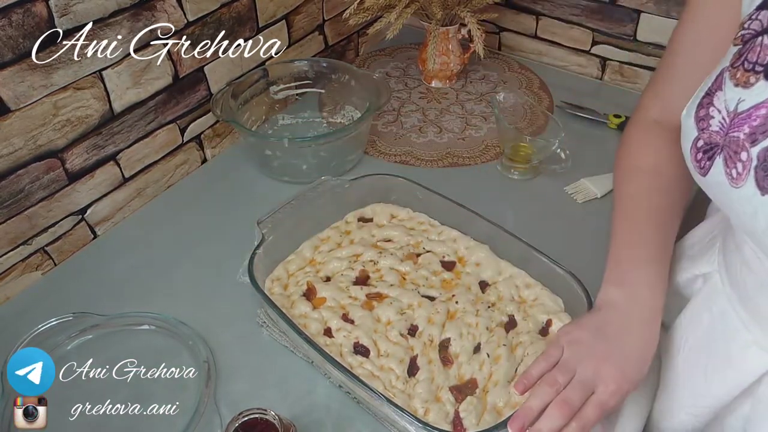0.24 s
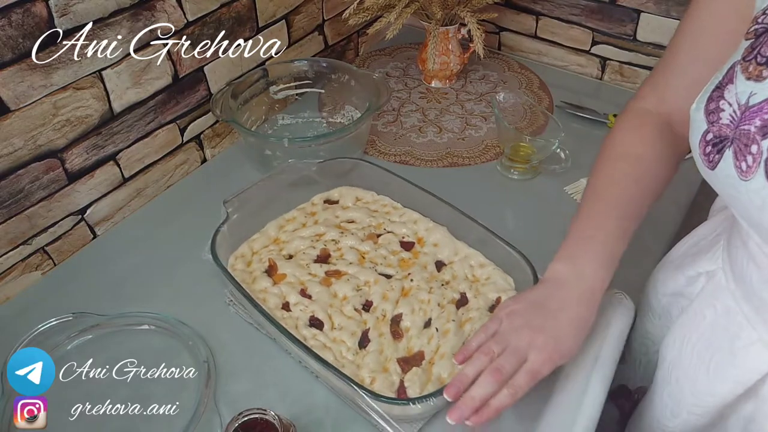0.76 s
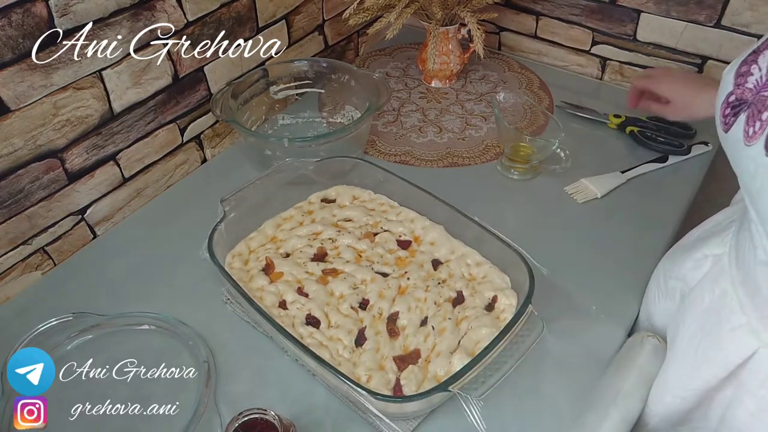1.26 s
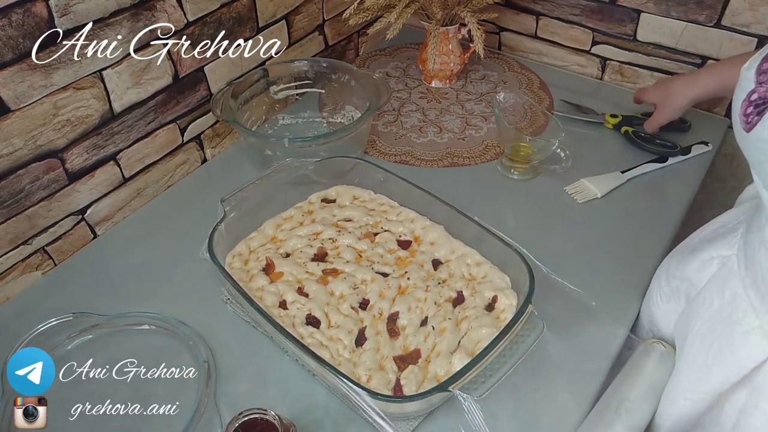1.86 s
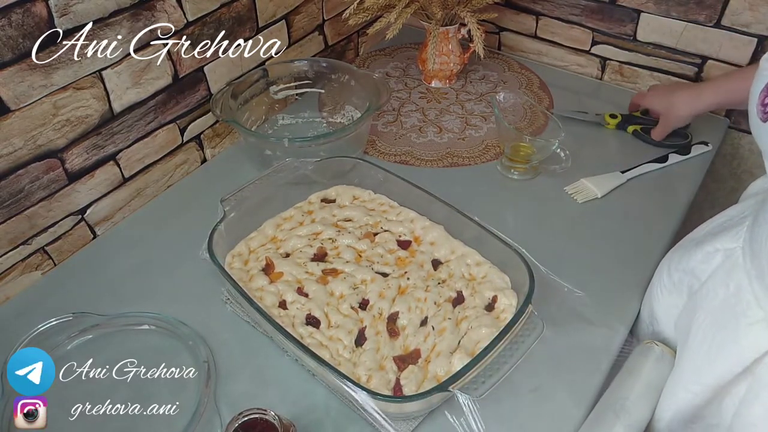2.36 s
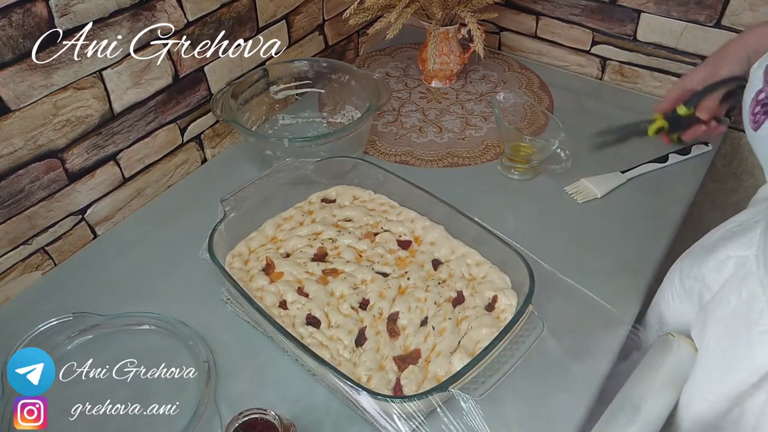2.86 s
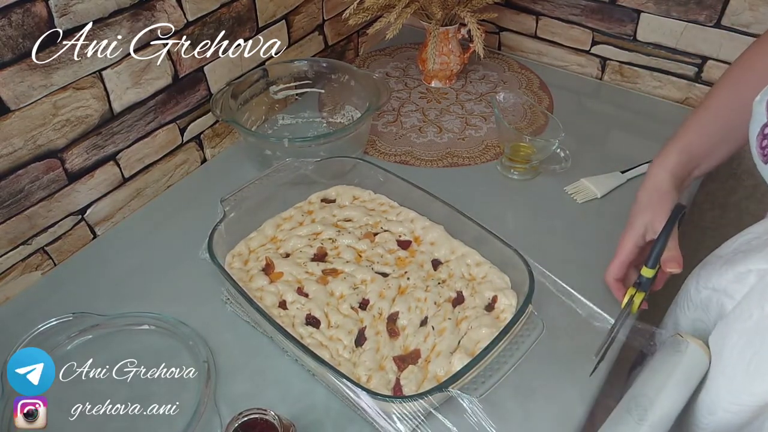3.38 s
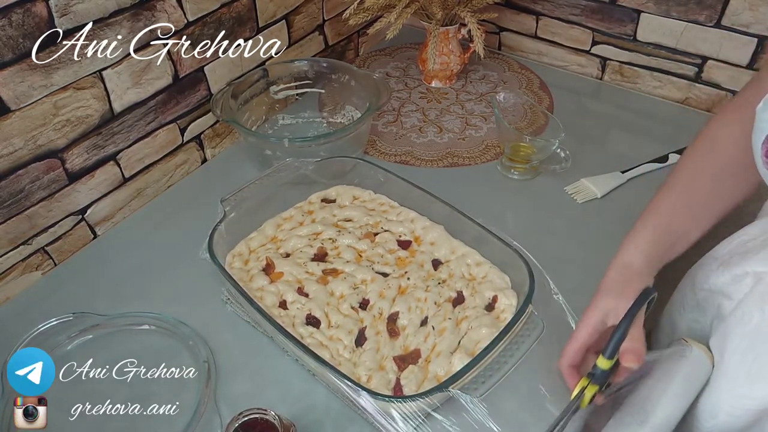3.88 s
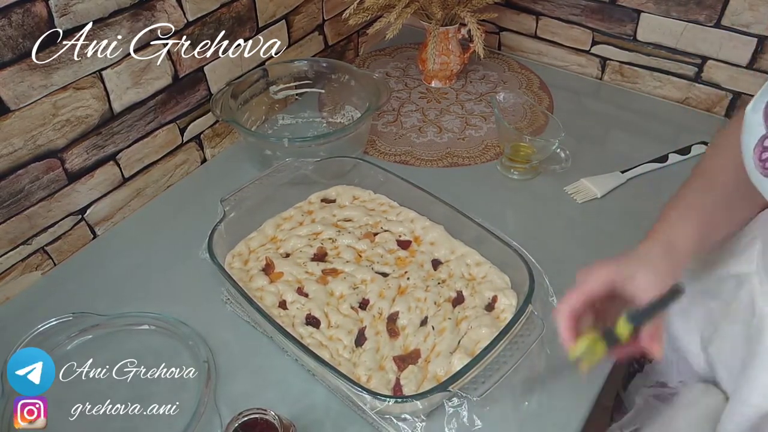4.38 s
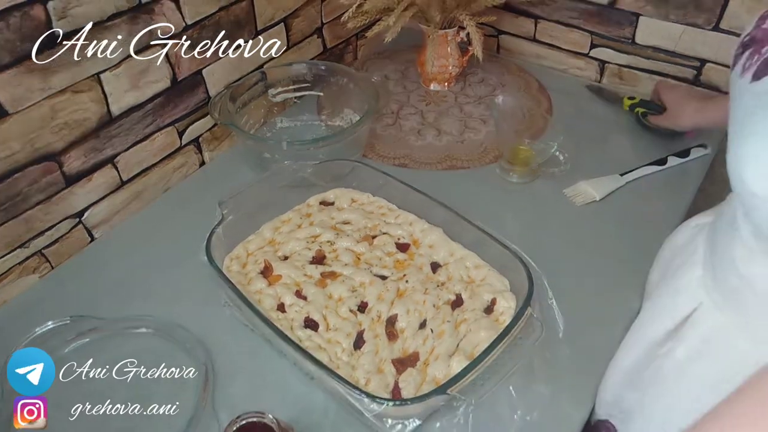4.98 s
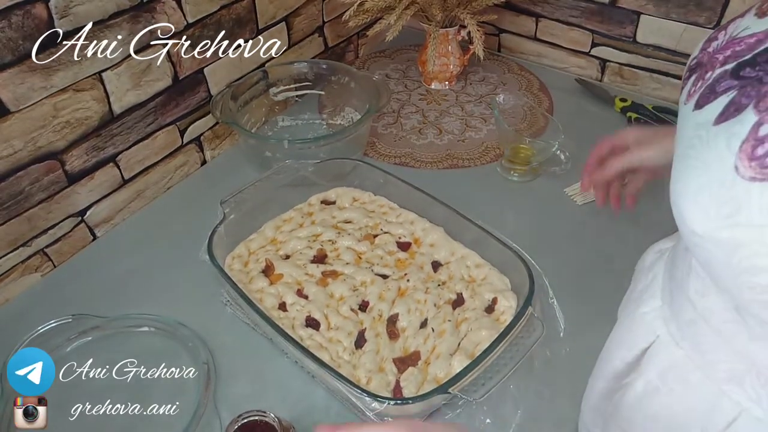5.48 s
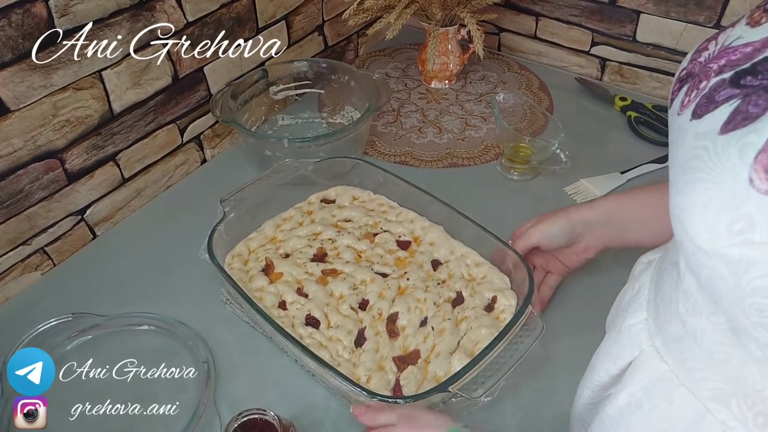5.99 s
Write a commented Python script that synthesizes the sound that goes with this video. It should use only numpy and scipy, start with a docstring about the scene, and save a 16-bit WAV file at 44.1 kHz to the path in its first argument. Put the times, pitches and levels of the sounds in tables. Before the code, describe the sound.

In a quiet kitchen, hands rub thin plastic film with faint crackles and light table knocks. Scissors are picked up with a sharp clack, then glide through the film in a raspy, wavering resonant note with bright snaps. They are laid down with a ringing knock, and a heavy bump hits the left of the close two-capsule microphone. A short slide and quiet rubbing follow, over faint motor whir and hiss.

```python
"""Hands smooth cling film over a dish in a quiet kitchen, close to a small two-capsule microphone: film rub,
crackle and snaps are coloured noise slips and puffs. Scissors are picked up, glide through the film with a wavering
resonant note, then are laid down with ringing knocks; bumps and rubbing at the left capsule are noise through its
resonances. Behind lie a faint motor of wavering sines, a low hum near 50 Hz with a low thump at about 0.26 s,
thin treble ticking and noise for room and hiss."""
import sys
import numpy as np
from scipy import signal
from scipy.fft import rfft, irfft
from scipy.io import wavfile
from scipy.ndimage import uniform_filter1d

SR = 44100
rng = np.random.default_rng(int(sys.argv[2]) if len(sys.argv) > 2 else 0)


def store_wav(level_fs):
    """Save 16-bit WAV to argv[1]."""
    pcm = np.round(np.clip(np.atleast_2d(level_fs), -1, 1) * 32767)
    wavfile.write(sys.argv[1], SR, pcm.T.astype(np.int16))


N = 275184


def gain_of(db):
    """Decibels to gain."""
    return 10 ** (np.asarray(db) / 20)


def evened(x):
    """Scales to rms 1."""
    return x / np.sqrt(np.mean(x ** 2) + 1e-20)


def read(points, hz):
    """Reads a spectrum table on a log-frequency axis."""
    f, value = np.transpose(points)
    return np.interp(np.log(hz + 1), np.log(f + 1), value)


def level(rows, columns=(1,)):
    """Gain curve through the summed dB columns, -130 dB outside the rows."""
    rows = np.array(rows)
    db = rows[:, list(columns)].sum(axis=1)
    return gain_of(np.interp(np.arange(N) / SR, rows[:, 0], db, -130, -130))


def swells(rows):
    """Gain curve of swells that rise and die away at a constant dB rate around each loudest moment."""
    t = np.arange(N) / SR
    return sum(gain_of(db - 20 * np.maximum((s - t) / build, (t - s) / die)) for s, db, build, die in rows)


def add(mix, s, sound):
    """Mixes a sound in at s seconds."""
    part = mix[round(s * SR):][:len(sound)]
    part += sound[:len(part)]


def coloured(x, points):
    """Minimum-phase filter with the shape of a spectrum table and unit energy."""
    db = np.maximum(read(points, abs(np.fft.fftfreq(4096, 1 / SR))), -100)
    spectrum = np.exp(np.conj(signal.hilbert(np.log(gain_of(db)))))
    taps = np.fft.ifft(spectrum).real[:2048]
    return signal.oaconvolve(x, taps / np.linalg.norm(taps))[:len(x)]


def resonate(x, hz, width):
    """A resonance of gain 1 whose centre may move: shifts to zero frequency, smooths, shifts back."""
    turn = np.exp(2j * np.pi * np.cumsum(hz * np.ones(len(x))) / SR)
    r = np.exp(-np.pi * width / SR)
    return 2 * (turn * signal.lfilter([1 - r], [1, -r], x / turn)).real


def grains(per_s, spread_db, smooth):
    """Sparse slips of unequal size over a share of smooth noise."""
    size = gain_of(spread_db * np.minimum(rng.exponential(1, N), 4))
    size = size * (rng.random(N) < per_s / SR)
    slips = evened(size * rng.standard_normal(N))
    return evened(slips + smooth * rng.standard_normal(N))


def wavering(hz, depth, width):
    """A tone whose level and phase wander, by adding narrow noise at its own frequency."""
    t = np.arange(N) / SR
    wander = evened(resonate(rng.standard_normal(N), hz, width))
    return evened(np.sin(2 * np.pi * hz * t) + depth * wander)


def patchy(x, depth_db):
    """Random patches of pitch and time come forward and fall back, alike on both sides."""
    z = signal.stft(x, nperseg=512)[2]
    patches = rng.standard_normal(z.shape[:0:-1])  # time by frequency
    patches = uniform_filter1d(uniform_filter1d(patches, size=8, axis=0), size=24, axis=1).T
    return signal.istft(z * gain_of(depth_db * evened(patches)), nperseg=512)[1][:, :N]


# Body of the film's rub. Each row: frequency in Hz, density in relative dB per Hz.
RUB_COLOUR = [(120, -61.5), (200, -7.5), (415, -8), (473, -2), (575, -2), (815, -12), (1040, -10),
              (1150, -1), (1480, -2), (2060, 5), (2700, -21.5), (3510, -60.5), (5940, -120)]
# Thin upper part of the rub. Each row: frequency in Hz, density in relative dB per Hz.
THIN_COLOUR = [(1500, -34), (2500, 2), (3500, 1), (4800, -4.5), (5600, -28), (8000, -48.5)]
# Treble of crackle and snaps. Each row: frequency in Hz, density in relative dB per Hz.
FIZZ_COLOUR = [(2940, -17.5), (5000, -10), (5560, -26.5), (5960, -23.5), (9310, -16), (11100, -12.5),
               (13500, -15), (15100, -9.5), (16000, -10)]
# Strokes of hands on film, one list per passage. Each row: time in seconds, rub level in relative dB,
# thin part in dB over it.
RUB_STROKES = [
    [(0.0, -76, -9), (0.55, -77, -1.5), (0.6, -74, 7), (0.88, -72.5, 1.5), (1.21, -77.5, -4),
     (1.4, -87, -27), (1.55, -72, -26), (1.74, -73, -6), (1.95, -77, -3.5), (2.21, -86, -1), (2.43, -64, 0),
     (2.89, -78.5, -12.5), (3.23, -88.5, 3), (3.35, -71.5, -14)],
    [(4.35, -70, -5), (4.43, -83, 1.5), (4.8, -77.5, -4)],
    [(5.7, -66.5, -11.5), (5.906, -67, -6), (6.24, -76, -4)],
]
# Blades gliding through film. Each row: time in seconds, rub level and fine crackle level in relative dB.
CUT = [(3.35, -78, -104), (3.41, -68, -91), (3.6, -63, -85), (3.666, -61.5, -72), (3.73, -48.5, -51),
       (3.775, -53.5, -58.5), (3.81, -49, -53), (3.84, -52, -49), (3.88, -47, -49), (3.96, -50, -46),
       (4.07, -52, -50), (4.14, -48.5, -54), (4.19, -52, -54), (4.25, -74, -75), (4.35, -75, -100)]
# Scissors sliding to rest. Each row: time in seconds, rub level in relative dB.
SLIDE = [(5.262, -95), (5.283, -37), (5.298, -55), (5.382, -49.5), (5.579, -56), (5.6, -64), (5.655, -73),
         (5.699, -59.5)]
# Resonant note of the film. Each row: time in seconds, centre frequency in Hz before it wavers,
# note level in dB over the rub.
FILM_NOTE = [(3.45, 819, 5.5), (3.62, 790, 10.5), (3.72, 813, 2), (3.81, 823, 7.5), (3.9, 935, 2.5),
             (3.98, 878, 0.5), (4.07, 893, 3.5), (4.25, 774, -5.5)]
# Bursts of fine crackle. Each row: loudest moment in seconds, level in relative dB,
# build-up and dying away in seconds per 20 dB.
CRINKLES = [(.31, -61.5, 0.039, 0.038), (.66, -71.5, 0.23, 0.7), (.96, -74, .1, 0.017),
            (1.04, -78, 0.019, 0.16), (2.36, -85, .01, 0.19), (3.13, -82, 0.99, 0.1043),
            (3.4, -75.5, .045, 0.58), (3.54, -72, .1, 0.02927), (3.6, -71, .05, 0.12),
            (4.36, -76.5, 0.23, 0.62), (4.968, -42.5, 0.0023, 0.041), (5.0, -57.5, 0.026, 0.21),
            (5.272, -63, 0.0075, 0.075), (5.44, -64.5, 0.15, 0.065), (5.54, -64, 0.17, 0.16),
            (5.87, -70.5, 0.17, 0.23), (6.07, -69, 0.1, 0.088)]
CUT_THIN_DB, SLIDE_THIN_DB = -5.5, -11  # thin part over the rub


def film():
    """Dense stick-slips make a shared rub and note, while thin part and fizz differ on the two sides."""
    flutter = gain_of(1.5 * evened(uniform_filter1d(rng.standard_normal(N), 600)))
    note_s, note_hz, note_db = np.transpose(FILM_NOTE)
    t = np.arange(N) / SR
    hz, note_db = np.interp(t, note_s, note_hz), np.interp(t, note_s, note_db)
    hz *= 1 + 0.054 * evened(uniform_filter1d(rng.standard_normal(N), 1800))  # tension wavers

    body = sum(level(rows) for rows in RUB_STROKES + [CUT, SLIDE])
    thin = sum(level(rows, (1, 2)) for rows in RUB_STROKES)
    thin += gain_of(CUT_THIN_DB) * level(CUT) + gain_of(SLIDE_THIN_DB) * level(SLIDE)
    clumps = gain_of(1.2 * evened(uniform_filter1d(rng.standard_normal(N), 2000)))
    fizz = (swells(CRINKLES) + level(CUT, (2,))) * clumps

    slips = grains(per_s=1500, spread_db=1.8, smooth=1.6)
    note = evened(resonate(resonate(slips, hz, 190), hz, 360))
    upper_modes = evened(resonate(resonate(slips, 2.43 * hz, 220), 2.13 * hz, 400))
    near_modes = evened(resonate(resonate(slips, 1.317 * hz, 130), 1.39 * hz, 220))
    slide_hiss = evened(resonate(resonate(slips, 7400, 2200), 6100, 2600))
    rub = body * (coloured(slips, RUB_COLOUR) + gain_of(note_db) * note)
    rub += body * gain_of(note_db - 6.5) * upper_modes
    rub += body * gain_of(note_db - 10.5) * near_modes
    rub += gain_of(-22) * level(SLIDE) * slide_hiss

    fine = []
    for _ in "LR":
        thin_part = thin * coloured(grains(per_s=980, spread_db=2.0, smooth=1.0), THIN_COLOUR)
        crackle = fizz * coloured(grains(per_s=2000, spread_db=2.0, smooth=2.2), FIZZ_COLOUR)
        fine.append(thin_part + crackle)
    return (rub + patchy(np.array(fine), depth_db=2.5)) * flutter


# Single snaps of the film. Each row: start in seconds, level in relative dB, low click in dB over it.
SNAPS = [(0.2936, -52.5, 16), (0.6511, -47, 5.5), (0.925, -59.5, 21.5), (0.9300, -60, 29.5),
         (0.9572, -44.5, 10.5), (2.355, -62, 21), (2.373, -49, 20), (3.0948, -72, 19), (3.293, -56.5, 11),
         (3.3984, -59, 14), (3.541, -49, -4), (3.5773, -55, -7), (3.593, -44.5, 9), (3.599, -48, -4),
         (3.631, -46, -6), (3.6666, -64.5, -11), (3.686, -38, -16), (3.705, -33, -6), (3.734, -37.5, -9),
         (3.789, -41, -8), (3.9945, -51, 10), (4.055, -51, 10), (4.094, -41, 12), (4.162, -41, 4),
         (4.1788, -34, 1), (4.185, -39, -6), (4.206, -42, -6), (4.9658, -26.5, 5.5), (5.2707, -57, 10),
         (5.278, -53, 15), (5.2844, -54, 19), (5.37, -56, 18), (5.444, -51, 20), (5.8713, -51.5, 12),
         (6.054, -45, -7)]
# Lower click of a snap. Each row: frequency in Hz, density in relative dB per Hz.
SNAP_COLOUR = [(500, -28), (1100, -1.5), (2400, -7.5), (4800, -20), (6500, -40.5)]


def snaps():
    """Single creases snap: a tiny noise puff, heard as a bright tick and a lower click."""
    high, low, t = np.zeros(N), np.zeros(N), np.arange(300) / SR
    for (s, db, low_db), puff in zip(SNAPS, rng.standard_normal((len(SNAPS), 300))):
        puff = puff * gain_of(-60 * t / 0.009) * (1 - np.exp(-t / 0.0002))
        puff = gain_of(db + 6.0) * puff / np.linalg.norm(puff)
        add(high, s, puff)
        add(low, s, puff * gain_of(low_db))
    return coloured(high, FIZZ_COLOUR) + coloured(low, SNAP_COLOUR)


# Knocks on the table. Each row: time in seconds, level in relative dB, favoured mode in Hz, its lift in dB,
# tilt of thud, low, middle and bright modes in dB over the level, damping as a factor on the decay rate.
KNOCKS = [(0.243, -60, 994, 1.9, 14, 9, -1, -2, 2.7), (0.301, -52, 710, 7, -10, -39, -7, -5, 1.06),
          (0.339, -47.5, 880, 6.9, -30, -11, -8, -5, 6.1), (0.518, -55, 710, 11, 1, -29, -4, -3, 2),
          (1.105, -55, 1024, 8.6, -19.5, -8, -8.5, -9.5, 1.16),
          (1.354, -47.5, 687, 6.6, -4.5, 13, -43, -15, 2.5),
          (1.567, -46, 816, 12.7, -11, 2.5, -6, -17, 0.89),
          (1.748, -56.5, 760, 15, -12.5, 5.5, -17, -16, 0.41),
          (2.097, -58.5, 928, 10, -11, -8, -23, 0.5, 1.1), (2.195, -58, 637, 9.2, -32, 3, -28, -11, 0.89),
          (2.242, -56, 1278, 7.3, -20, -13, -2, -10, 0.43), (2.249, -50, 790, 21, -17, -8, -9, -15, 0.93),
          (2.3655, -32.5, 910, 7.4, -4, -4, 3, -2.5, 3.96), (2.4141, -43.5, 3750, 6, -5, -4.5, -6, 0, 2.2),
          (2.649, -42, 793, 11, -5, 4.5, -8.5, -30, 3.25), (3.255, -44, 690, 10, -6, 2, -2.5, -10, 3.3),
          (4.922, -43.5, 2155, 52, -27, -42, -23, -5, 2.4),
          (4.923, -27, 688, 10.6, -17, 9.5, -19.5, -15.5, 2.12),
          (5.232, -45, 676, 5.4, -6.5, -7, -16, -33, 0.79),
          (5.281, -40.5, 806, 7.7, 0.5, -10, -16, -13, 1.6), (5.367, -44.5, 710, 5.2, -6, -1, -10, -6, 0.8),
          (5.441, -40.5, 1000, 14, -6, 16, -9, -0.5, 5.2), (5.593, -51, 712, 6, -25, -4.5, -15, -9, 0.53),
          (6.138, -51, 940, 11, -18, -24, -8.5, -11.5, 1.5)]
# Modes a knock rings. Each row: frequency in Hz before slight detuning, level in relative dB,
# 60 dB decay time in seconds at damping 1.
RINGS = [(114, 5, 0.41), (149.9, 8, 0.092), (196.5, -2, 0.27), (335, -5, 0.08), (369, 0, 0.05),
         (672, -1, 0.11), (804, -5, 0.16), (866.5, -0.5, 0.1), (985, -1.5, 0.098), (1246, -5, 0.12),
         (1278, 5.5, 0.099), (1370, 7.5, 0.068), (1643, 2.5, 0.061), (1973, -7.5, 0.17), (2193, -8, 0.17),
         (2470, -26, 0.048), (2970, -8, 0.026), (3550, 8.5, 0.065), (3660, 5, 0.038), (4100, 8, 0.026)]
KNOCK_RISE_S = 0.00058
TOP_DB, TOP_PER_BRIGHT = -9, 1.4  # the highest modes follow the brightness, more steeply


def knocks():
    """Each knock cracks and excites the same modes, tilted by where and how hard it lands; loose parts chatter."""
    out, t = np.zeros(N), np.arange(SR // 2) / SR
    crack_t = t[:1500]
    hz, db, t60 = np.transpose(RINGS)[:, :, None]
    cracks = rng.standard_normal((len(KNOCKS), 1500))
    chatter = uniform_filter1d(uniform_filter1d(rng.standard_normal(N), 300), 150)
    chatter = 1 + 0.25 * evened(chatter)
    luck = rng.random((len(KNOCKS), 2, len(RINGS), 1))
    for row, (detune, phase), crack in zip(KNOCKS, luck, cracks):
        s, knock_db, main_hz, lift_db, thud, low, middle, bright, damp = row
        top = TOP_DB + TOP_PER_BRIGHT * bright
        tilt = [(40, thud - 30), (113, thud), (350, low), (800, -0.5), (1350, middle), (2100, bright),
                (3600, top), (5000, top - 8), (6500, top - 35)]
        favour_db = lift_db * np.exp(-((hz - main_hz) / 45) ** 2)
        rise_s = KNOCK_RISE_S / 2 + 0.67 / hz  # low modes take longer to build
        damping = np.where(hz < 150, np.sqrt(damp), damp)  # the table top is harder to damp
        fall_db = 60 * t * damping / t60
        ring = gain_of(db + read(tilt, hz) + favour_db - fall_db) * (1 - np.exp(-t / rise_s)) ** 2
        ring *= np.sin(2 * np.pi * (hz * (1 + 0.063 * (detune - .5)) * t + phase))
        add(out, s - .002, gain_of(knock_db) * ring.sum(0))

        crack = crack * gain_of(-60 * crack_t * damp / 0.12) * (1 - np.exp(-crack_t / rise_s[-1]))
        crack = coloured(crack, tilt + [(16000, top - 60)])
        add(out, s - .001, gain_of(knock_db + 1.5) * crack * np.linspace(1, 0, 1500))
    return out * chatter


# Hands pressing on the table top. Each row: loudest moment in seconds, level in relative dB,
# build-up and dying away in seconds per 20 dB.
PRESSES = [(.03, -65, 0.11, 0.56), (.27, -52, 0.11, 0.047), (.45, -65.5, 0.1, 0.12),
           (.575, -61.5, 0.09, 0.27), (.91, -62, 0.022, 0.13), (1.27, -65.5, 0.036, 0.18),
           (1.41, -54.5, 0.089, 0.45), (1.76, -60, 0.13, 0.17), (2.27, -58.5, 0.31, 0.13),
           (2.42, -41.5, .06, 0.059), (2.57, -61, 0.091, 0.11), (2.69, -64, .06, 0.066),
           (2.84, -64.5, 0.099, .05), (3.29, -55.5, 0.2, 0.11), (3.62, -71, 0.12, 0.1),
           (3.77, -52, 0.24, 0.1)]


def table_top():
    """The two lowest modes of the table, stirred unevenly by hands."""
    upper = gain_of(-13.0) * evened(resonate(rng.standard_normal(N), 190, 44))
    return (wavering(111, depth=0.44, width=10.0) + upper) * swells(PRESSES)


# Bumps on the left capsule. Each row: start in seconds, mount level in relative dB, shell and sharp edge in dB
# over it, 60 dB decay time in seconds after a short hold, favoured mount mode in Hz.
BUMPS = [(4.9656, -19, -17.5, -15, 0.031, 245), (4.974, -19.5, -11, -6, 0.035, 238),
         (4.9866, -19, -14, -14, 0.027, 144), (4.999, -34, -4, -22, 0.029, 190),
         (5.013, -33.5, 0.5, -19, 0.046, 143), (5.027, -30.5, 2, -16, 0.018, 192),
         (5.0357, -32.5, -1.5, -13, 0.018, 190), (5.047, -33, -6.5, -41, 0.17, 147),
         (5.062, -31, -7, -39, 0.043, 131), (5.0767, -45, -13, -1, 0.018, 180),
         (5.0887, -44, -24, -15, 0.024, 180), (5.129, -40, -3.5, -39, 0.034, 189.3),
         (5.155, -41, -8, -36, 0.04, 167), (5.181, -43.5, -13.5, -37, 0.04, 140),
         (5.237, -44.5, -29, -29, 0.13, 106), (5.284, -57, -17, 2, 0.14, 130),
         (5.31, -51.5, -9, -2, 0.19, 175)]
# Mount of the microphone. Each row: frequency in Hz, first resonance width in Hz, level in relative dB.
MOUNT = [(100.5, 58, 1), (145, 83, 3.5), (180, 43, 8), (239, 91, 3)]
# Shell of the microphone. Each row: frequency in Hz, first resonance width in Hz, level in relative dB.
SHELL = [(297.4, 18, 4.5), (376, 30, 6), (434, 35, -4)]
# Sharp edge of a bump. Each row: frequency in Hz, density in relative dB per Hz.
SHARP_COLOUR = [(290, -26), (500, 2.5), (578, -6), (993, -2.5), (1400, -24.5), (2900, -26.5), (3320, -34),
                (3960, -33.5), (5600, -70), (7600, -42), (9000, -69), (13200, -71)]
# Rubbing on the left capsule. Each row: time in seconds, level in relative dB, deep part in dB over it.
HANDLING = [(4.955, -81, -26), (4.984, -28.5, -11), (5.106, -46, 2.5), (5.176, -47.5, 6),
            (5.208, -68.5, 16.5), (5.298, -55.5, 13), (5.402, -53.5, 1.5), (5.618, -68.5, 13.5),
            (5.89, -71, 7), (6.24, -79, 13)]
BUMP_HOLD_S, TICK_S, SCUFF_DB = 0.012, 0.002, -15  # the edge is a short tick over a little scuffing
FAVOUR_DB_PER_OCTAVE = 24.5  # mount modes weaken away from the favoured one


def ring_body(x, modes):
    """Rings each body mode through two resonances in a row."""
    return sum(gain_of(db) * resonate(resonate(x, hz, width), hz, 107) for hz, width, db in modes)


def handling():
    """Bumps ring the microphone's mount and shell; rubbing gives a lumpy rumble."""
    left, t = np.zeros(N), np.arange(6000) / SR
    shoves = rng.standard_normal((len(BUMPS), 3, 6000))
    for (s, db, shell_db, sharp_db, t60, main_hz), shove in zip(BUMPS, shoves):
        shape = gain_of(-60 * np.maximum(t - BUMP_HOLD_S, 0) / t60) * (1 - np.exp(-t / 0.0014))
        mount = [(hz, width, mode_db - FAVOUR_DB_PER_OCTAVE * abs(np.log2(hz / main_hz)))
                 for hz, width, mode_db in MOUNT]
        blow = 5.5 * np.exp(-t / 0.00072)  # the first contact, before the scuffing
        edge = np.exp(-t / TICK_S) + gain_of(SCUFF_DB) * shape
        parts = [(ring_body((shove[0] + blow) * shape, mount), db),
                 (ring_body(shove[1] * shape, SHELL), db + shell_db),
                 (coloured(shove[2] * edge, SHARP_COLOUR), db + sharp_db)]
        shape_rms = np.sqrt(np.mean(shape ** 2))  # longer bumps carry more energy
        for part, part_db in parts:
            add(left, s, gain_of(part_db) * evened(part) * shape_rms)

    noise = rng.standard_normal((3, N))
    deep = evened(resonate(resonate(noise[0], 49, 31), 64, 110))
    rumble = evened(resonate(resonate(noise[1], 140, 120), 138, 143))
    scrape = evened(resonate(noise[2], 400, 200))
    left += deep * level(HANDLING, (1, 2))
    left += rumble * level(HANDLING)
    left += gain_of(-21.5) * scrape * level(HANDLING[4:])  # scraping after the main bumps
    return np.array([2 * left, gain_of(-31) * left])


# Thin treble ticking. Each row: time in seconds, level in relative dB.
TICKING = [(1.95, -80), (2.36, -74)]


def ticking():
    """Irregular faint high ticks from sparse coloured grains, almost wholly on the left."""
    colour = [(9000, -26), (12500, 4.5), (14500, 13), (16000, 13)]
    ticks = coloured(grains(per_s=180, spread_db=0.5, smooth=0.53), colour)
    return np.array([[2], [.1]]) * ticks * level(TICKING)


def pair(a, b, lean, same):
    """Two capsules: frequency by frequency, the right shares a portion of the left and leans in level."""
    hz = np.fft.rfftfreq(N, 1 / SR)
    same, right = np.clip(read(same, hz), -1, 1), gain_of(-read(lean, hz))
    a, b = rfft(a), rfft(b)
    mixed = right * (same * a + np.sqrt(1 - same ** 2) * b)
    return irfft(np.array([a, mixed]) * 2 / np.sqrt(1 + right ** 2), N)


# Steady wash of the room. Each row: frequency in Hz, density in relative dB per Hz.
ROOM_COLOUR = [(24, -17.5), (40, -27), (117, -0.5), (212, -12), (348, -5.5), (504, -8), (645, -2),
               (827, -14), (1020, -0.5), (1300, -17.5), (1770, -3.5), (2750, -11.5), (3100, -23),
               (4300, -23), (5400, -68), (7000, -51), (12000, -110)]
# Capsule hiss. Each row: frequency in Hz, density in relative dB per Hz.
HISS_COLOUR = [(3240, -44), (5500, -81), (7930, -9.5), (8400, -18.5), (11500, -9), (12800, -1.5),
               (14300, 9.5), (16000, 4)]
# Balance of wash and hiss. Each row: frequency in Hz, left over right in dB.
ROOM_LEAN = [(60, 51), (110, 56), (200, 8.2), (380, 1.5), (700, 5.2), (1290, 27), (2380, 15.7), (4400, 1.5),
             (8120, 16), (15000, 14)]
# Likeness of the two sides in wash and hiss. Each row: frequency in Hz, likeness clipped to -1..1.
ROOM_SAME = [(60, 0.86), (180, 1.9), (550, 0.1), (1650, -0.53), (4970, -0.014), (15000, -0.2)]
# Lines of the motor. Each row: frequency in Hz, mean level of the two sides in dB rms, left over right in dB.
WHIR = [(293, -82, 14), (342, -78.5, 0.5), (447, -86, 12), (639, -83, 23), (944, -87.5, 23),
        (1403, -88, 5.5), (1752, -81.5, 17.5), (2024, -88.5, 5), (2140, -92, 18), (2640, -86.5, 3),
        (2900, -96.5, 2), (3430, -95.5, -21)]
# Low hum near 50 Hz, with a low thump at about 0.26 s. Each row: time in seconds, level in relative dB.
HUM_AND_THUMP = [(0, -85), (.25, -71), (.27, -65), (.4, -84), (3, -80.5), (5.6, -80), (5.9, -75),
                 (6.24, -72)]
ROOM_DB, HISS_DB = -68.5, -83.5  # before the two-capsule balance


def room_tone():
    """Steady wash, capsule hiss, the wavering lines of a motor, and a low tone for the hum and early thump."""
    sides = []
    for _ in "LR":
        wash = gain_of(ROOM_DB) * coloured(rng.standard_normal(N), ROOM_COLOUR)
        hiss = gain_of(HISS_DB) * coloured(rng.standard_normal(N), HISS_COLOUR)
        sides.append(wash + hiss)
    out = pair(*sides, ROOM_LEAN, ROOM_SAME)
    for hz, db, lean_db in WHIR:
        sides_db = db + np.array([[.5], [-.5]]) * lean_db
        out += gain_of(sides_db) * wavering(hz, depth=0.32, width=4.2)
    low_tone = level(HUM_AND_THUMP) * wavering(49.3, depth=0.93, width=3.4)
    return out + low_tone * np.array([[2], [.6]])


def scattered(x, step_hz, turns):
    """Another path to the other capsule: same colour, phases that wander with frequency."""
    hz = np.fft.rfftfreq(N, 1 / SR)
    knots = np.arange(60) * step_hz
    phase = np.interp(hz, knots, turns * 2 * np.pi * (rng.random(60) - .5))
    phase = phase * hz / (hz + 400) - 2 * np.pi * hz * 5 / SR  # less wander in the bass; 5 samples early
    return irfft(rfft(x) * np.exp(-1j * phase), N)


def kitchen(x, first_s, t60, dull_t60):
    """Sparse reflections of random sign; treble dies sooner, the deepest bass is not thrown back."""
    taps = np.zeros(SR // 2)
    at = np.arange(int(first_s * SR), SR // 2 - 20, 20)
    at = at + rng.integers(0, 20, SR // 40 + 1)[:len(at)]
    taps[at] = rng.choice([-1., 1.], SR // 40 + 1)[:len(at)]
    hz, t, z = signal.stft(taps, SR, nperseg=256)
    decay_s = read([(500, t60), (8000, dull_t60)], hz)[:, None]
    tail = signal.istft(z * gain_of(-60 * t / decay_s), SR, nperseg=256)[1]
    tail = signal.sosfilt(signal.butter(2, 170, "high", fs=SR, output="sos"), tail)
    return signal.fftconvolve(x, tail / np.linalg.norm(tail))[:N]


# Balance of sounds from the table. Each row: frequency in Hz, left over right in dB.
TABLE_LEAN = [(60, -14.5), (110, 8), (200, 0.5), (380, 4), (700, 4.5), (1290, 0), (2380, -10),
              (4400, -14.5), (8120, -38.5), (15000, 5)]
# Likeness of the two sides in table sounds. Each row: frequency in Hz, likeness from -1 to 1.
TABLE_SAME = [(60, 1), (180, 0.94), (550, 0.52), (1650, -0.49), (4970, 0.42), (15000, 0.011)]


def scene():
    """Table sounds reach each capsule by their own path and reflections; snaps arrive unblurred."""
    left, right = film() + knocks() + table_top()
    right = scattered(right, step_hz=282.0, turns=1.0)
    left, right = np.array([left, right]) + snaps()
    left = left + gain_of(-5.5) * kitchen(left, first_s=0.004154, t60=0.59, dull_t60=0.18)
    right = right + gain_of(-8.0) * kitchen(right, first_s=0.0036, t60=0.83, dull_t60=0.55)
    table = gain_of(-7.0) * pair(left, right, TABLE_LEAN, TABLE_SAME)
    return table + room_tone() + handling() + ticking()


def record(dry):
    """The capsules lose the deepest bass; then a steep low-pass limits the band."""
    thin = signal.sosfilt(signal.butter(4, 38, "high", fs=SR, output="sos"), dry)
    band_limit = signal.firwin(511, 15900, window=("kaiser", 9), fs=SR)
    return signal.oaconvolve(thin, band_limit[None], "same")


dry = scene()
out = record(dry)
store_wav(out)
```